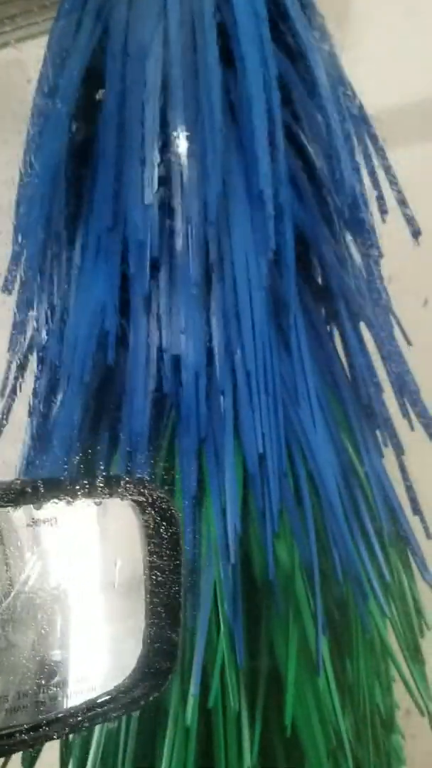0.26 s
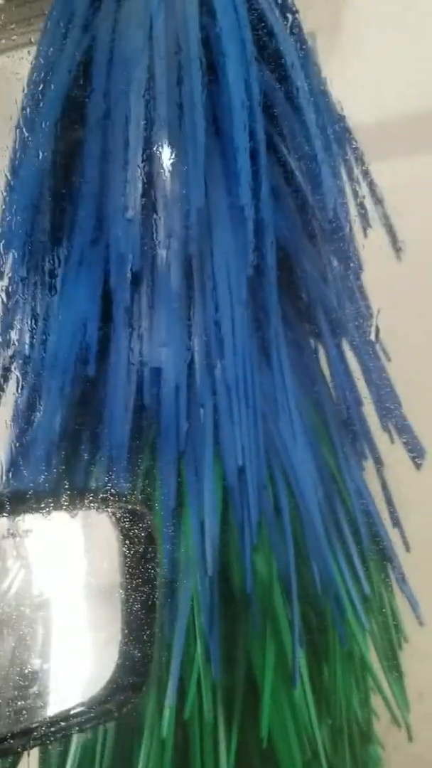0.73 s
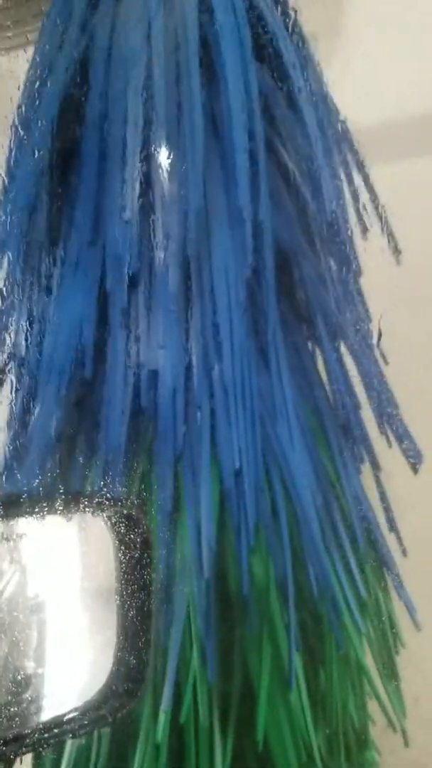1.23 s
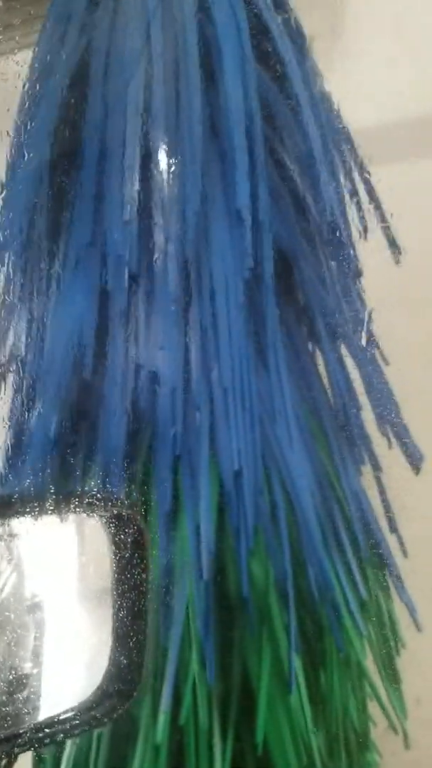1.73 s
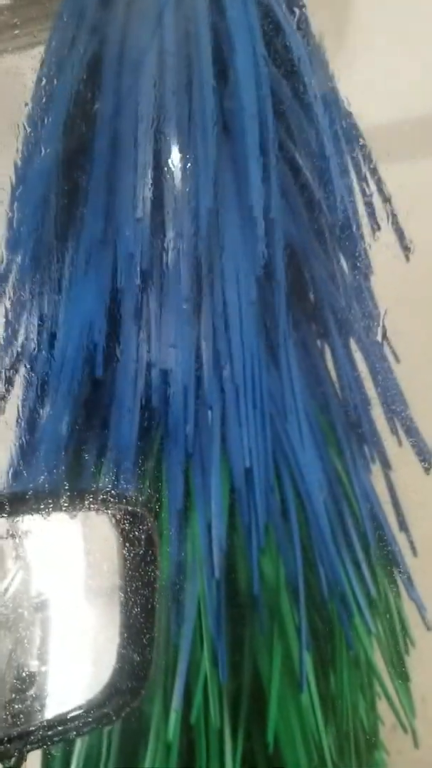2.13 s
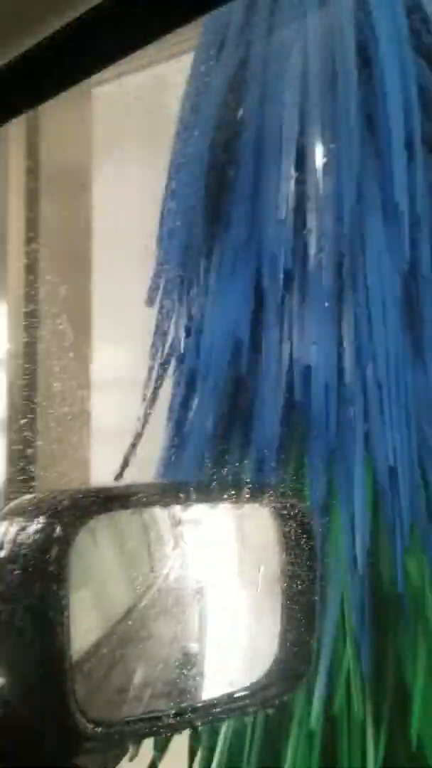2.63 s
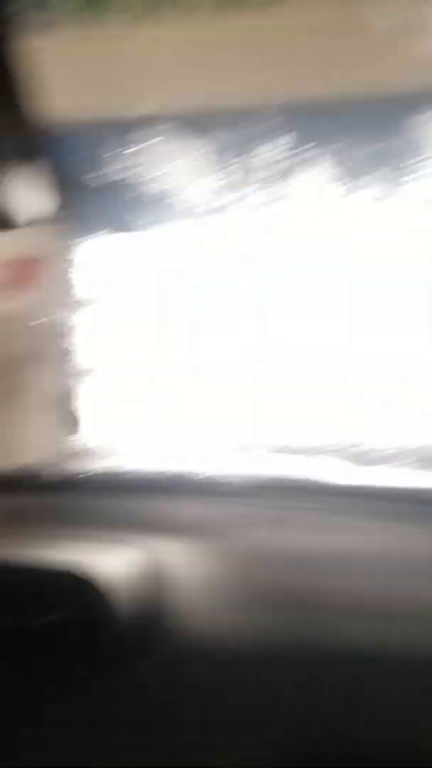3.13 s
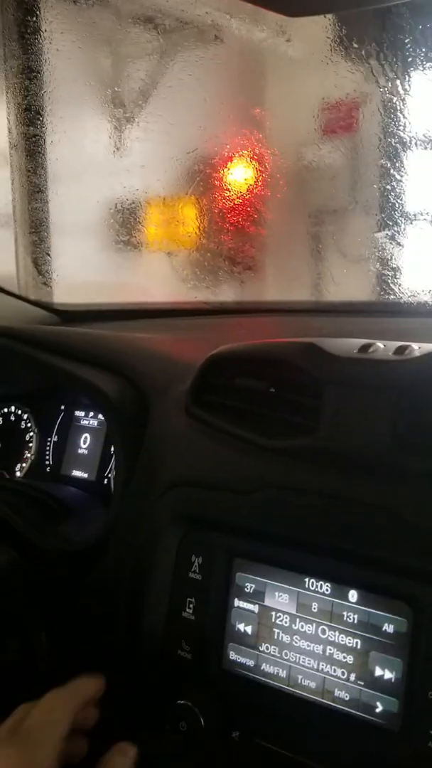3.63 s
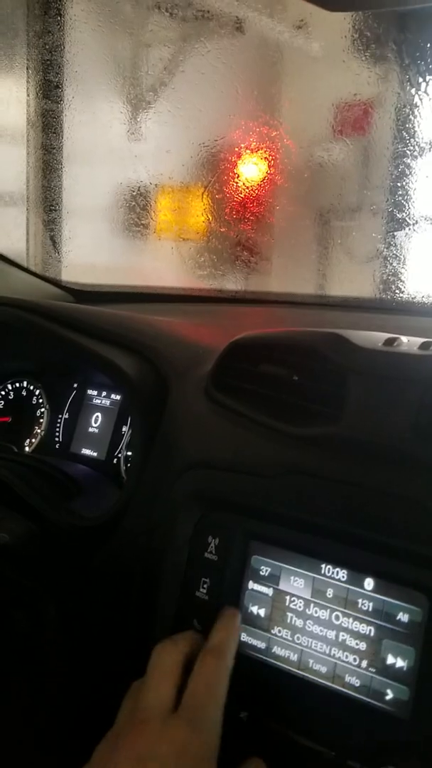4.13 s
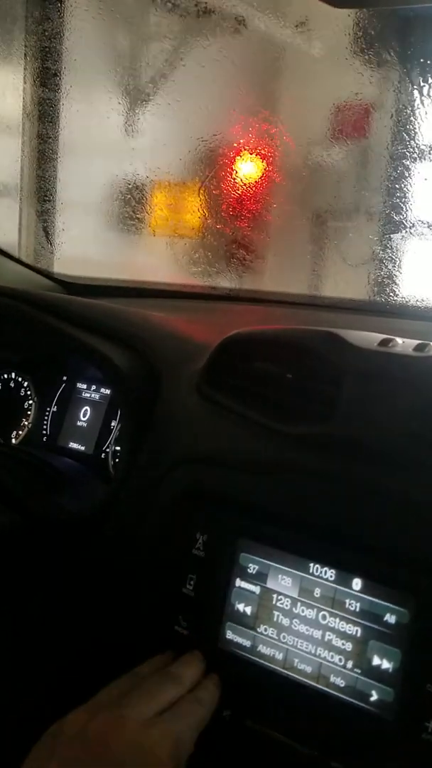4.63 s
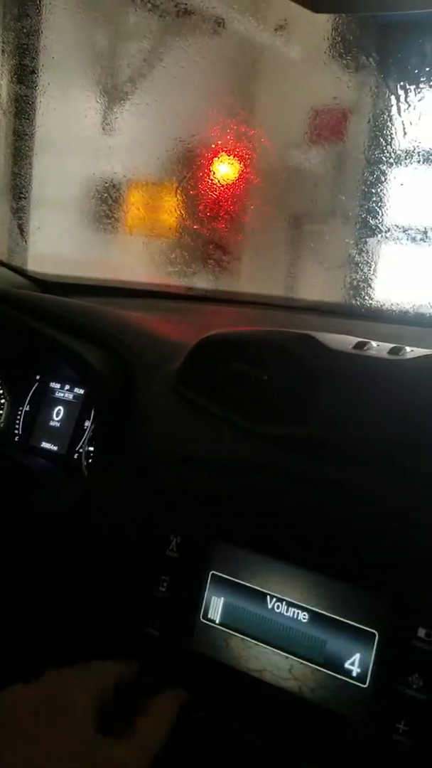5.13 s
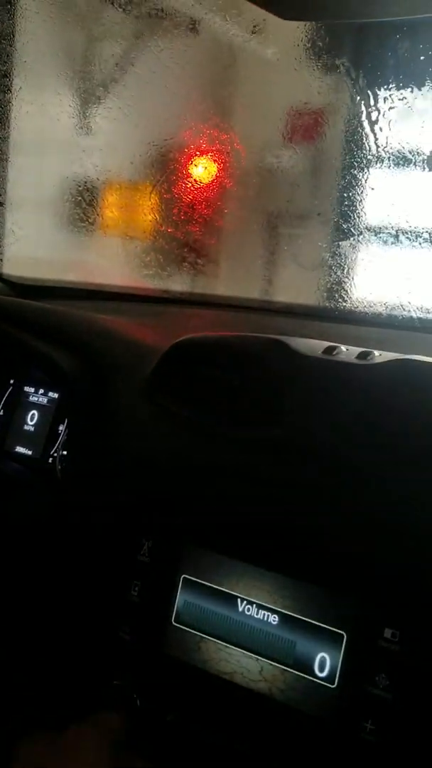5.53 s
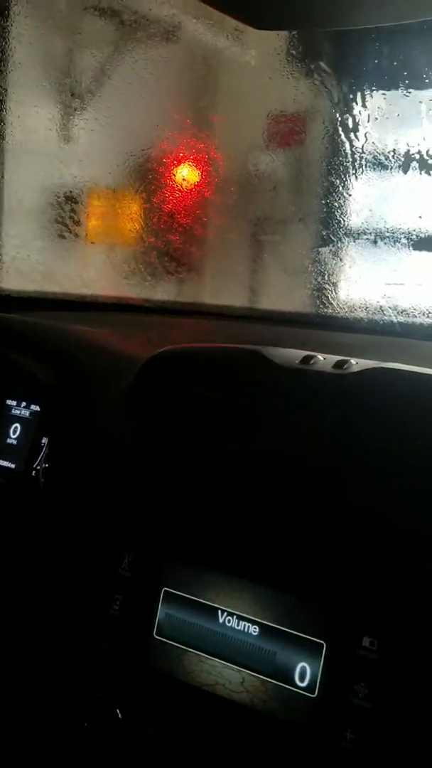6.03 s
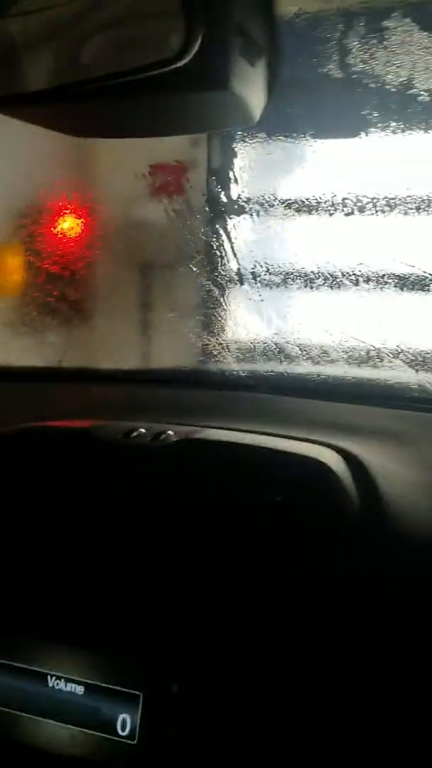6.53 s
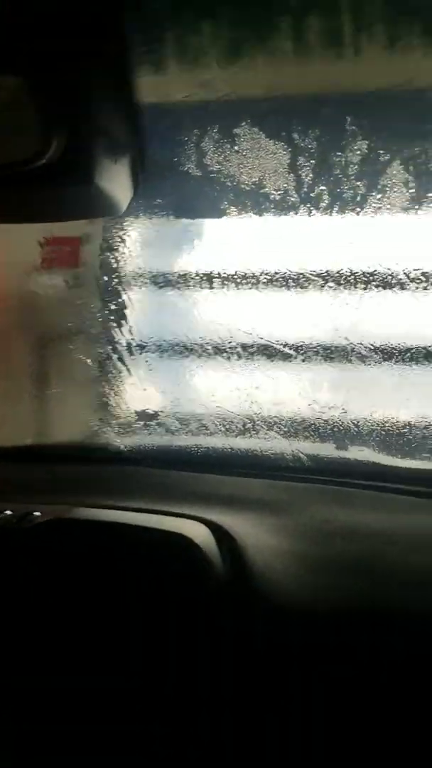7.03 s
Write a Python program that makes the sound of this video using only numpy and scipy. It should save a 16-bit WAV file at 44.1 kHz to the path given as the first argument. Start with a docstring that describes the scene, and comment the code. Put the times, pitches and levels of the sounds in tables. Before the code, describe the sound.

Throughout about 7.3 seconds, a closed car cabin booms with deep, throbbing brush rumble and a wandering motor hum near 48 hertz, while dull spray washes over the glass. Small pitched drops tap during the first second and a half, mostly right, with brief cloth rustle around 0.3. From 1.1 to 1.6 a loud, irregular cluster of plastic rattles and low door thuds breaks out; fainter knocks come at 1.75 and 2.6. The boom swells at 2.3. A thin hollow jet hiss fades in before 3, and a strong low air buffet strikes only the right channel around 3.1. At 4 a second wash adds a steady, wavering panel drone and faint fizz. Around 4.9 to 5.1 the boom surges with close sleeve rustle and knocks; lighter contacts follow at 5.5. Soft rubbing at 6.2 to 6.6 leads to weaker right-side buffets near 6.9 and 7.1, with drumming rising briefly.

```python
"""Inside a closed car in an automatic wash: motor-driven brushes drum on the body and the cabin air booms.
Random drive with a wandering hum gives the boom; filtered noise gives the spray dulled by the glass.
At about four seconds a second wash joins in, its noise exciting the resonances of the panels.
Knocks are decaying bursts with ringing door modes; drops tap, a jet hisses and a sleeve rustles.
Low-frequency noise buffets the right port of the phone as it swings, over a faint microphone hiss."""
import sys
import numpy as np
from scipy import signal
from scipy.fft import rfft, irfft, next_fast_len
from scipy.io import wavfile
from scipy.ndimage import map_coordinates

SR = 44100
rng = np.random.default_rng(int(sys.argv[2]) if len(sys.argv) > 2 else 0)


def store_wav(level_fs):
    """Save 16-bit WAV to argv[1]."""
    pcm = np.round(np.clip(np.atleast_2d(level_fs), -1, 1) * 32767)
    wavfile.write(sys.argv[1], SR, pcm.T.astype(np.int16))


N = 320607
TIME = np.arange(N) / SR  # seconds


def brushes():
    """Forced excitation: bristle impacts drum on the body while the drive hums and pumps the cabin air."""
    # swells of the boom and drumming: start_s, hold_s, boom_db, drumming_db
    swells = [(.13, 0.039, -30, -42), (1.115, .05, -32, -50), (1.747, 0.16, -30.5, -53),
              (2.285, 0.045, -25.5, -54), (2.57, .11, -32.5, -43), (2.865, 0.017, -38, -51),
              (3.634, 0.035, -29, -52), (3.947, 0.038, -30.5, -45), (4.195, .45, -36, -56),
              (4.882, 0.095, -24, -37), (6.963, 0.17, -36, -33.5)]
    # noise spectrum of the pumped cabin air: frequency_hz, relative_density_db
    boom_spectrum = [(12, -15.5), (25, 3), (32, -14.5), (41, 1.5), (48, -2), (57, 0), (75, -10),
                     (110, -35.5), (200, -92)]
    # noise spectrum of bristles on the body: frequency_hz, relative_density_db
    drumming_spectrum = [(45, -14), (75, -4.5), (95, 3), (135, -4.5), (165, -9.5), (210, -18), (300, -25.5),
                         (500, -39.5), (1000, -88.5)]
    swell_rise_s, swell_fall_s = 0.078, 0.039  # time for 20 dB
    boom_db, throb_db = -32.5, 1.0  # mean level between swells and its random throbbing
    drum_db, drum_fade_db_per_s = -34, 0.31  # the drumming eases as the brushes move along the car
    motor_hz, motor_wander_hz = 48.23, 1.489  # mean pitch and its random wander
    hum_db = -0.5  # sine amplitude relative to the load

    motor_pitch_hz = motor_hz + motor_wander_hz * wobble(rate=4)
    hum = np.sin(2 * np.pi * np.cumsum(motor_pitch_hz) / SR)

    swell_boom, swell_drum = sum(
        amp([[swell_boom_db], [swell_drum_db]]) * swell(start, hold, swell_rise_s, swell_fall_s)
        for start, hold, swell_boom_db, swell_drum_db in swells)
    # independent contributions add in power
    load = np.hypot(amp(boom_db + throb_db * wobble(rate=8)), swell_boom)
    pumping = load * noise()
    boom = pumping.std() * cabin(pumping, colour(boom_spectrum))
    boom = boom + amp(hum_db) * load * hum

    drumming = np.hypot(amp(drum_db - drum_fade_db_per_s * TIME), swell_drum)
    beating = drumming * amp(1.28 * wobble(rate=19))
    return boom + beating * cabin(noise(), colour(drumming_spectrum))


def water():
    """Transmission loss: the glass passes a dull broadband wash and a muffled patter of drops."""
    # water flung at the glass: time_s, wash_db, spray_db
    flung_water = [(0, -54.5, -59), (1.2, -54.5, -58), (2.9, -56, -63), (3.6, -55, -61.5),
                   (3.95, -56, -67.5), (4.45, -53.5, -57.5), (7.27, -54, -55.5)]
    # noise spectrum of the wash: frequency_hz, relative_density_db
    wash_spectrum = [(150, -42.5), (300, -6.5), (450, 1), (640, 3), (780, -2), (1000, 0), (1300, -8),
                     (1900, -8), (3000, -18.5), (5000, -73)]
    # noise spectrum of the drops: frequency_hz, relative_density_db
    spray_spectrum = [(700, -26.5), (1500, -2), (2000, 0), (2450, 1), (3100, -6.5), (3700, -4.5),
                      (4450, -3.5), (4750, -9.5), (5100, -45), (7000, -26), (9000, -46)]
    wash_db, spray_db = curves(flung_water)
    beat = wobble(rate=17)  # bundles of wet bristles arrive unevenly
    wash = amp(wash_db + 0.58 * beat) * cabin(noise(), colour(wash_spectrum))
    drops = 1.5 + 0.58 * patter(rate=70, spread_db=-2.0, t60=0.074)
    spray = amp(spray_db + 0.5 * beat) * cabin(noise() * drops, colour(spray_spectrum))
    return wash + spray


def rinse():
    """Resonance under broadband excitation: the second wash makes the panels drone, with a thin fizz above."""
    # panel resonances: frequency_hz, width_hz, relative_level_db
    panels = [(322, 27, -8), (377.6, 18.7, 0.5), (450.7, 22, -1.5), (602, 33, -9), (706, 31, -12),
              (1239, 17.3, -11), (2262, 45, -14.5)]
    start_s, time_constant_s, drone_db = 3.98, 0.085, -49  # the wash opens and builds up pressure
    waver_db = 1.4  # unsteadiness of the drone
    pressure = 1 - np.exp(-np.maximum(TIME - start_s, 0) / time_constant_s)
    drone = cabin(noise(), resonances(panels)) * amp(waver_db * wobble(rate=10))
    # frequency_hz, relative_density_db
    fizz_spectrum = [(3500, -5.5), (4600, 4.5), (5200, 4.5), (5600, -8.0), (7200, -20), (9000, -43)]
    fizz = cabin(noise(), colour(fizz_spectrum))
    return amp(drone_db) * pressure * (drone + amp(-22.5) * fizz)


def knocks():
    """Impact excitation: scattered contacts rattle trim and hollow body, and a thud rings the door modes."""
    # blows: start_s, slap_db, relative_thud_db, body_re_slap_db, relative_treble_db, rise_s, t60_s
    blows = [(1.104, -23, -48, -28.5, 6.5, 0.0024, 0.059), (1.145, -46.5, -23, -23, -1, 0.0082, 0.048),
             (1.216, -37.5, -19, -1, -13, 0.017, 0.14), (1.265, -31, -13.5, -6, -9.5, 0.012, 0.11),
             (1.336, -38.5, -45, -6.5, -1, .006, 0.067), (1.348, -31, -23, -10, 1, 0.0037, 0.081),
             (1.394, -45, -50, 0, -2, .009, 0.051), (1.586, -49, -28.5, 3, 1.5, 0.007, 0.085),
             (1.755, -56, -28, 1.5, -6, 0.0072, 0.072), (2.637, -46, -41, 4.5, -20, 0.0038, 0.072),
             (4.917, -47.5, -28.5, 6.5, -2, 0.0034, 0.045), (4.956, -52.5, -23.5, 4.5, -5, 0.0034, 0.14),
             (5.055, -41, -31.5, -1, -8, 0.0039, 0.077), (5.499, -53, -32.5, 13, 1, 0.0026, 0.11),
             (5.541, -37, -28, 0, -15, 0.0026, 0.073)]
    # door panel modes: frequency_hz, relative_level_db, t60_s
    door_modes = [(92, -2.5, 0.084), (152, 5.5, .13), (194.4, -6.5, 0.099), (230.4, -11.5, 0.2),
                  (321, -50.5, 0.043)]
    # plastic trim resonances: frequency_hz, width_hz, relative_level_db
    trim_modes = [(1180, 670, -13.5), (1470, 290, -7), (2040, 155, 3), (2420, 240, -3), (2690, 110, -5),
                  (2870, 120, -6.5), (3650, 300, -9), (3830, 100, -4), (4320, 185, -5), (5120, 100, -18)]
    # noise spectrum of the hollow body: frequency_hz, relative_density_db
    hollow_spectrum = [(130, -19), (320, 10.5), (500, -4.5), (750, -0.5), (1100, -4.5), (1700, -12),
                       (3000, -43)]
    # noise spectrum of the sharp contacts: frequency_hz, relative_density_db
    snap_spectrum = [(3000, -34), (5000, 0), (6500, -3.5), (8000, -3.5), (9300, -6), (10800, 0),
                     (12500, -0.5), (13500, -6), (15500, -9.5)]
    contact_grain = 0.3  # separate contacts, against a steady 2.5

    slap, body, snap, thud = np.zeros((4, N))
    t = TIME[:SR // 3]
    for start, slap_db, thud_db, body_db, treble_db, rise, t60 in blows:
        first = round(start * SR)
        span = slice(first, first + len(t))
        attack = np.minimum(t / rise, 1) ** 0.66
        contact = attack * amp(-60 * np.maximum(t - rise, 0) / t60)
        slap[span] += amp(slap_db) * contact
        body[span] += amp(slap_db + body_db) * contact
        snap[span] += amp(slap_db + treble_db) * contact ** 2  # squaring keeps treble near the peak

        ring = np.zeros(len(t))
        for mode_hz, mode_db, mode_t60 in door_modes:
            decay = amp(mode_db + rng.normal(0, 1.65) - 60 * t / mode_t60)
            detuned_hz = mode_hz * (1 + rng.normal(0, 0.021))
            ring += decay * np.sin(2 * np.pi * detuned_hz * t)
        slow_start = 1 - np.exp(-t / (rise + 0.0016))  # inertia of the heavy panel
        thud[span] += amp(thud_db + 2.0) * ring * slow_start

    def trim_response(hz):
        """Modal resonance with a steep loss above 5400 Hz."""
        return resonances(trim_modes)(hz) / (1 + (hz / 5400) ** 12)

    scatter = unit(2.5 + contact_grain * patter(rate=250, spread_db=2, t60=0.0042))
    rattle = slap * cabin(noise(), trim_response) * scatter * amp(0.67 * wobble(rate=130))
    hollow = body * cabin(noise(), colour(hollow_spectrum))
    tick = amp(-18.5) * snap * scatter * cabin(noise(), colour(snap_spectrum))
    return rattle + hollow + tick + thud


def swing():
    """Turbulent pressure: moving air buffets the right port alone, its strongest lumps flattened off."""
    # puffs of air as the phone swings: start_s, hold_s, level_db
    puffs = [(2.96, 0.048, -33), (3.115, 0.019, -15.5), (3.16, .07, -16), (3.3, 0.063, -32),
             (6.642, 0.31, -32), (6.938, 0.025, -24.5), (7.083, 0.025, -20.5)]
    # spectrum of the air pressure: frequency_hz, relative_density_db
    buffet_spectrum = [(15, -17), (42, -5.5), (65, 8.5), (105, 1.5), (200, -13), (280, -32), (400, -28.5),
                       (600, -44), (1500, -82)]
    rise_s, fall_s = 0.015, 0.13  # time for 20 dB
    airflow = np.max([amp(db) * swell(start, hold, rise_s, fall_s) for start, hold, db in puffs], axis=0)
    pressure = unit(filtered(noise()[0], colour(buffet_spectrum)))
    lumps = np.tanh(0.5 * pressure)
    return airflow * unit(lumps) * np.array([[0], [1]])


def sleeve():
    """Friction noise: cloth slides close to the microphone in tugs, its fibres catching in tiny grains."""
    # sleeve strokes: start_s, hold_s, level_db, left_minus_right_db
    stroke_table = [(0.281, 0.0067, -46.5, 0.5), (0.383, 0.055, -54, 1), (1.002, 0.031, -58, -3),
                    (3.134, .05, -60.5, -11.5), (3.2, 0.073, -54.5, -7.5), (4.035, 0.28, -72, 3),
                    (4.889, 0.066, -41.5, 0), (4.991, 0.053, -41, 5.5), (5.119, .07, -63, 4),
                    (5.406, 0.071, -63, 6), (5.5, 0.024, -55, 4.5), (5.838, .1, -65.5, 5.5),
                    (6.225, 0.13, -55.5, -6.5), (6.38, 0.25, -59.5, -8)]
    # rustling cloth at each port: frequency_hz, left_density_db, right_density_db
    cloth_spectra = [(800, -25, -4), (2660, -4, 3.5), (4620, -1, 10.5), (5730, -1.5, -16),
                     (7030, 0.5, -11.5), (9450, -15, -8), (10600, -5.5, -15), (12400, -3, 6),
                     (14200, 0, -4.5), (15800, 4, -7)]
    rise_s, fall_s = 0.07, 0.079  # time for 20 dB
    rub_db = -0.14  # how unevenly the cloth tugs
    strokes = [
        amp(db + pan_db * np.array([[0.5], [-0.5]])) * swell(start, hold, rise_s, fall_s)
        for start, hold, db, pan_db in stroke_table]
    fibres = 2.0 + 0.44 * patter(rate=370, spread_db=14, t60=0.0069)
    cloth_hz, *ports = np.transpose(cloth_spectra)

    def port_response(hz):
        """Spectral shaping by one gain curve for each port."""
        return np.array([amp(along(np.c_[cloth_hz, db], hz)) for db in ports])

    rustle = unit(filtered(noise() * fibres, port_response))
    return np.max(strokes, axis=0) * amp(rub_db * wobble(rate=43)) * rustle


def taps():
    """Impulsive narrow-band noise: each large drop on the glass has its own pitch, mostly on the right."""
    # drops: start_s, relative_level_db, pitch_hz, t60_s
    drop_table = [(.094, -44, 1490, 0.043), (0.133, -53, 4000, 0.037), (0.218, -39.5, 4030, 0.032),
                  (0.441, -39.5, 2740, 0.032), (.462, -50, 3760, 0.11), (0.509, -44.5, 4000, 0.027),
                  (0.582, -56, 4200, 0.023), (0.747, -46.5, 3700, 0.08), (.868, -45.5, 2110, 0.054),
                  (1.05, -53, 3200, 0.1), (1.463, -51.5, 3980, 0.088), (2.147, -57, 2500, .04),
                  (4.104, -55, 13000, 0.027)]
    half_width_hz, attack_s = 470, 0.0017  # half the band of a drop; time constant of its attack
    out = np.zeros((2, N))
    t = TIME[:SR // 8]
    for start, db, hz, t60 in drop_table:
        edges_hz = [hz - half_width_hz, hz + half_width_hz]
        band = signal.butter(2, edges_hz, "bandpass", fs=SR, output="sos")
        burst = unit(signal.sosfilt(band, rng.standard_normal((2, len(t)))))
        envelope = amp(db + 3.0 - 60 * t / t60) * (1 - np.exp(-t / attack_s))
        out[:, round(start * SR):][:, :len(t)] += envelope * burst
    return out * amp([[-7], [2]])  # left, right


def jet():
    """Jet noise: a narrow jet passing over the roof draws a hollow band of hiss from it."""
    # strength of the jet: time_s, level_db
    jet_levels = [(2.3, -74.5), (2.8, -64), (3.2, -64), (3.7, -61.5), (4.2, -64)]
    level_db, = curves(jet_levels)
    # frequency_hz, relative_density_db
    spectrum = [(600, -35.5), (1000, -26.5), (1250, 2.5), (1450, -1), (1750, -21.0), (2600, -34.5)]
    return amp(level_db) * cabin(noise(), colour(spectrum))


def microphone_hiss():
    """Self-noise: faint stationary hiss, unrelated at the two ports."""
    # noise spectrum of the microphone: frequency_hz, relative_density_db
    hiss_spectrum = [(1000, -5.5), (6000, -3.5), (10000, -3), (15500, 2.5)]
    return amp(-71.5) * unit(filtered(noise(), colour(hiss_spectrum)))


def cabin(x, response):
    """Interaural-like coherence: rms-1 sound, bass alike at both ports, presence stronger on the right."""
    # likeness of the two ports: frequency_hz, correlation
    likeness = [(60, .994), (130, .99), (290, .8), (640, 0.7), (1400, 0.05), (3100, -0.1), (7000, 0)]
    # balance of the two ports: frequency_hz, left_minus_right_db
    balance = [(60, -1.2), (200, 0), (380, 1), (700, 1), (1300, -4), (2400, -12.5), (4400, -16), (5600, 11),
               (8000, -2), (15000, 5)]
    m = next_fast_len(N)
    hz = np.fft.rfftfreq(m, 1 / SR)
    # mixing angle that turns unrelated noises into a pair of the wanted correlation
    angle = np.arccos(np.clip(along(likeness, hz), -1, 1)) / 2
    mid, side = rfft(x, m) * response(hz) * np.array([np.cos(angle), np.sin(angle)])
    left_share = 1 / (1 + amp(-2 * along(balance, hz)))  # share of the power
    ports = np.array([mid + side, mid - side]) * np.sqrt([left_share, 1 - left_share])
    return unit(irfft(ports, m)[:, :N])


def resonances(modes):
    """Modal superposition: response of (Hz, width Hz, dB) resonances with alternating sign."""
    def response(hz):
        """Sum of damped second-order resonances."""
        return sum(
            (-1) ** k * amp(db) * 1j * hz * width / (centre ** 2 - hz * hz + 1j * hz * width)
            for k, (centre, width, db) in enumerate(modes))
    return response


def patter(rate, spread_db, t60):
    """Poisson impacts: rms-1 envelope of many small decaying hits, rate a second, adding in power."""
    sizes = amp(spread_db * np.minimum(rng.exponential(size=N), 3))
    hits = (rng.random(N) < rate / SR) * sizes
    decay = amp(-60 * TIME[:SR // 8] / t60)
    power = signal.fftconvolve(hits ** 2, decay ** 2)[:N]
    return unit(np.sqrt(np.abs(power)))


def swell(start, hold, rise, fall):
    """Exponential growth and decay: gain rises to 1, holds, dies away; rise and fall are times for 20 dB."""
    before = np.maximum(start - TIME, 0)
    after = np.maximum(TIME - start - hold, 0)
    return amp(-20 * (before / rise + after / fall))


def wobble(rate):
    """Slow random modulation: a smooth curve through random knots, rate of them a second."""
    return map_coordinates(rng.standard_normal(1024), [TIME * rate], mode="mirror")


def noise():
    """Incoherent sources: unrelated white noise for the two ports."""
    return rng.standard_normal((2, N))


def filtered(x, response):
    """Linear filtering: multiply the spectrum of x by a response of frequency."""
    m = next_fast_len(N + SR // 2)
    return irfft(rfft(x, m) * response(np.fft.rfftfreq(m, 1 / SR)), m)[..., :N]


def colour(points):
    """Spectral colouring: the gain of a (Hz, dB) spectrum as a function of frequency."""
    return lambda hz: amp(along(points, hz))


def along(points, hz):
    """Logarithmic frequency scale: (Hz, value) points joined on a log axis."""
    f, v = np.transpose(points)
    return np.interp(np.log(hz + 1), np.log(f + 1), v)


def curves(rows):
    """Linear interpolation in time: one value per sample for each column after the time."""
    s, *cols = np.transpose(rows)
    return [np.interp(TIME, s, c) for c in cols]


def amp(db):
    """Level law: decibels to amplitude gain."""
    return 10 ** (np.asarray(db) / 20)


def unit(x):
    """Effective value: scale to rms 1."""
    return x / np.sqrt(np.mean(x ** 2) + 1e-20)


def scene():
    """Superposition: all sources heard from the driver's seat add linearly."""
    outside = brushes() + water() + rinse() + knocks() + taps() + jet()
    return outside + swing() + sleeve() + microphone_hiss()


def record(dry):
    """Band limiting: the phone keeps nothing from its upper limit on."""
    top_hz = 15830
    return filtered(dry, lambda hz: hz < top_hz)


dry = scene()
out = record(dry)
store_wav(out)
```